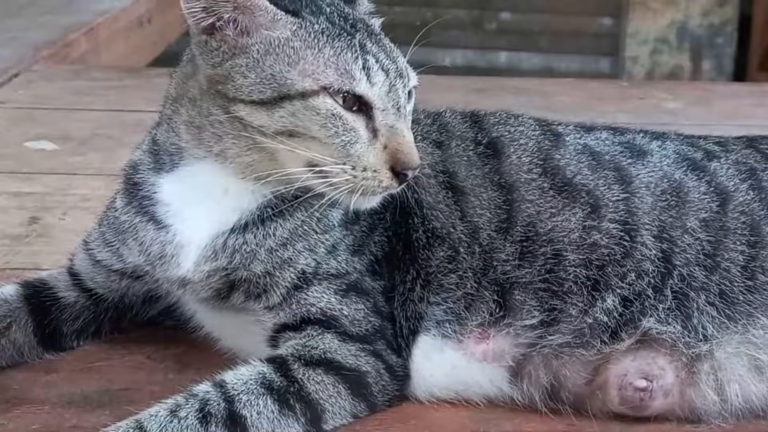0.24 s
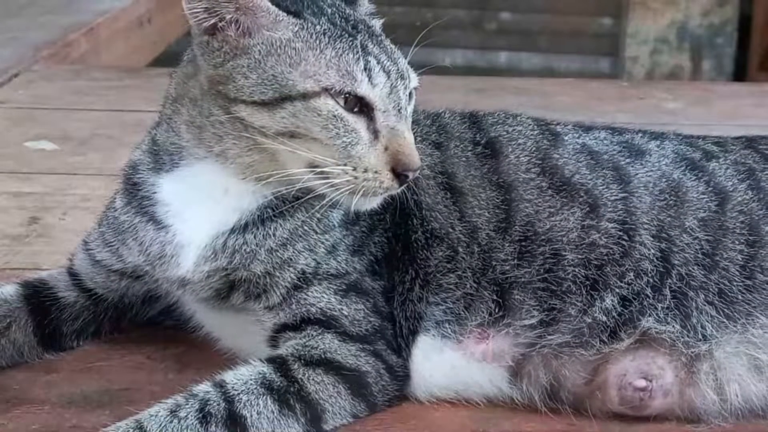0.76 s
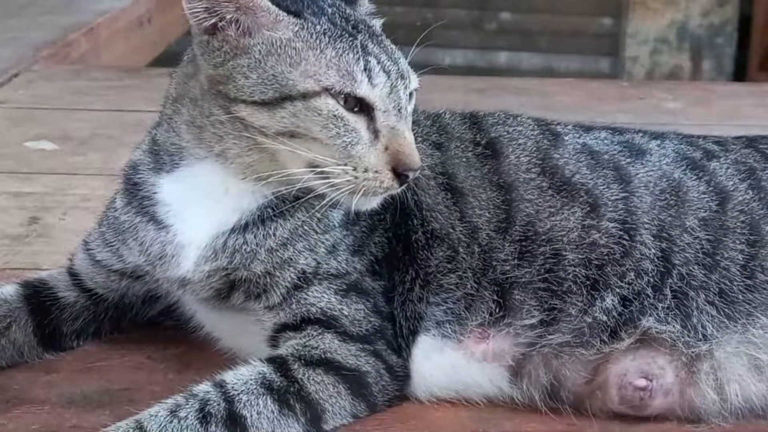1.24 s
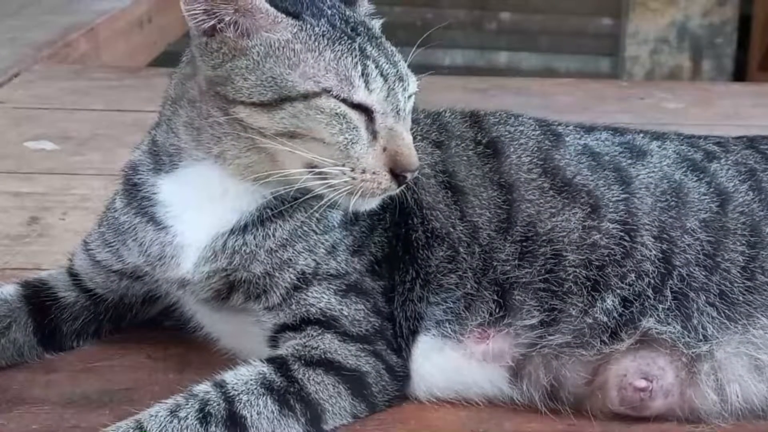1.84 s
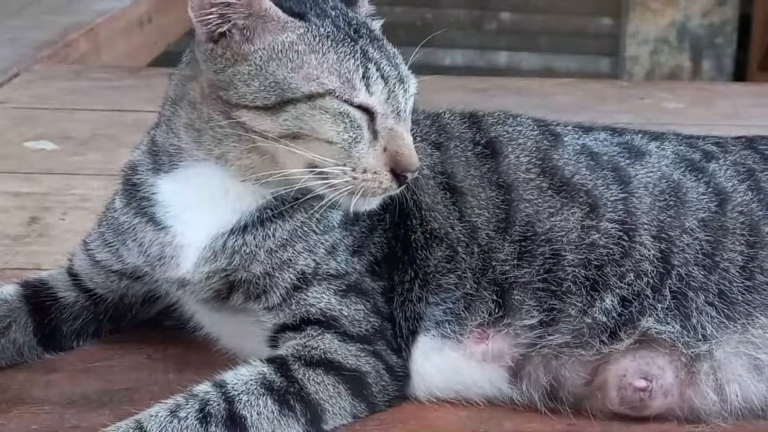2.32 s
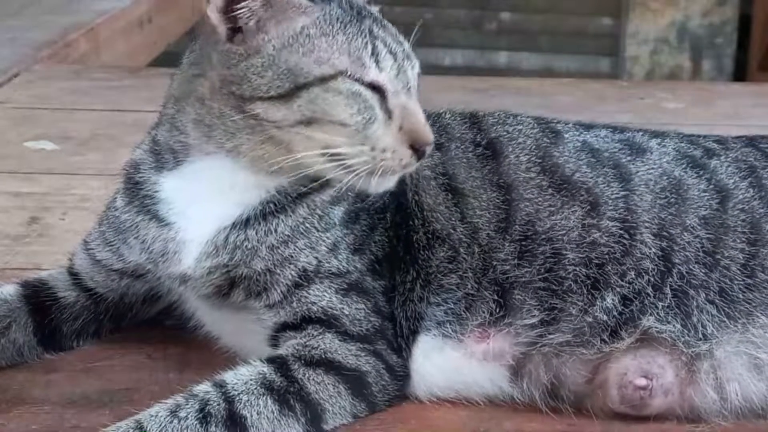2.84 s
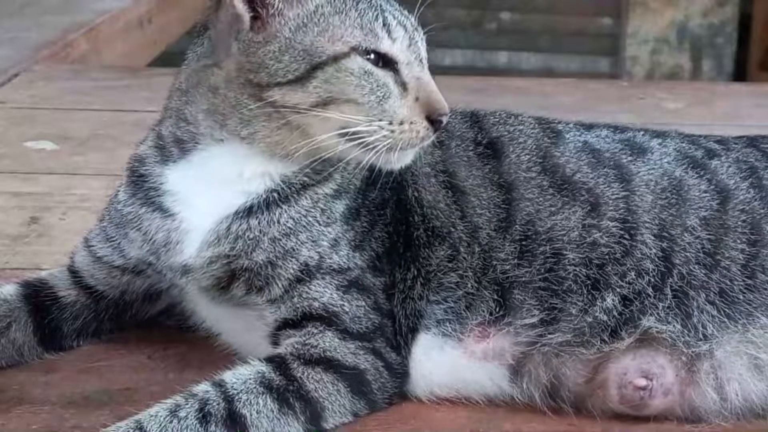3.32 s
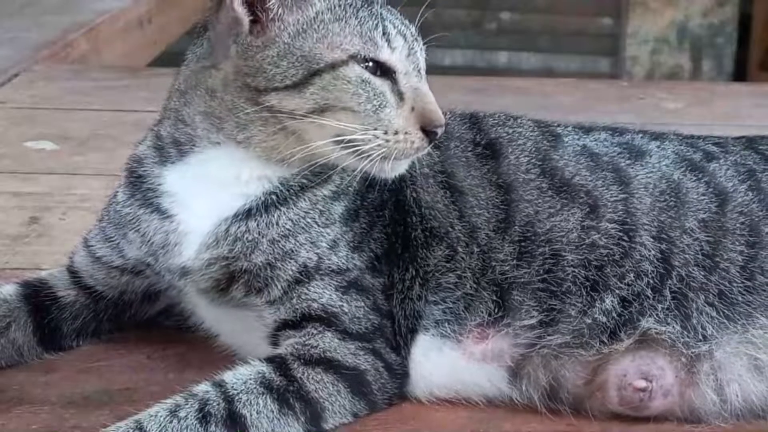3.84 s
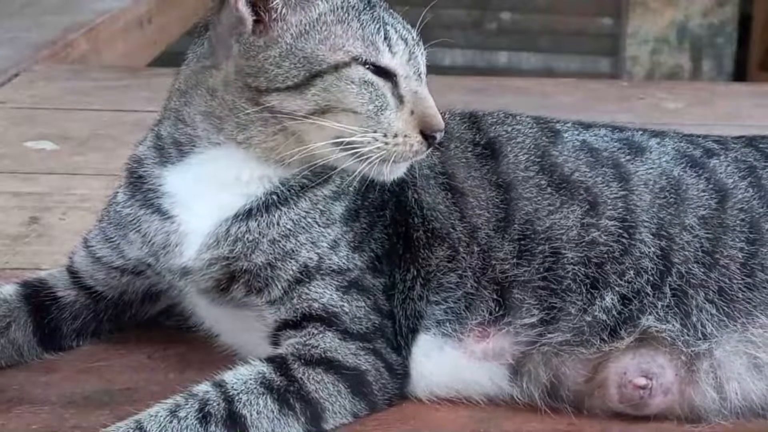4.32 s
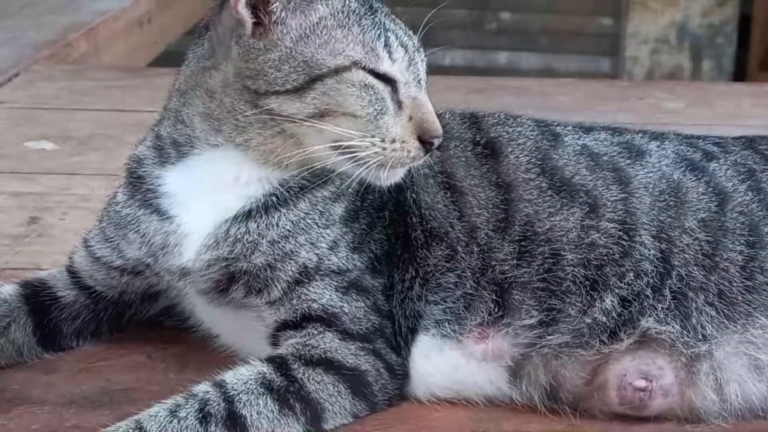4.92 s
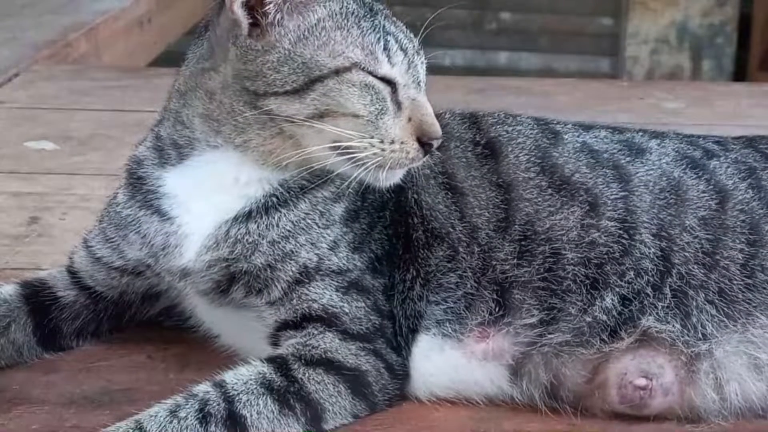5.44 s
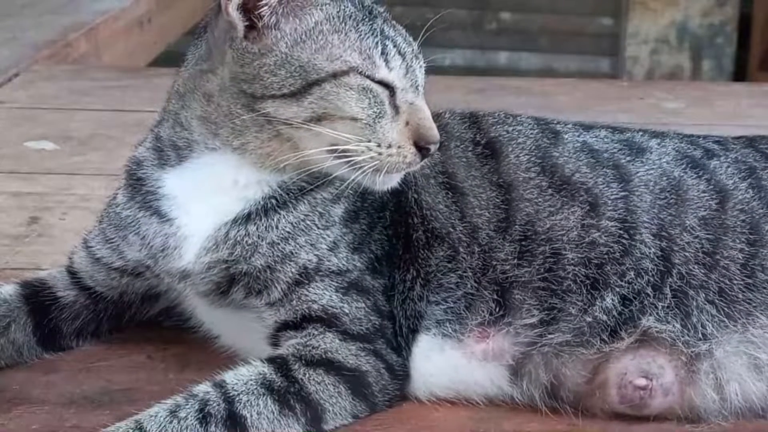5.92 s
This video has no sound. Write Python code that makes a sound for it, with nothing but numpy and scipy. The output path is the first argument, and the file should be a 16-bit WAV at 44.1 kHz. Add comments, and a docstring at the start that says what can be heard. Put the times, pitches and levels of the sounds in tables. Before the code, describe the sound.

Three loud, nasal cat yowls, the last turning hoarse, with a low traffic hum and a small motorbike puttering past between them.

```python
"""A street hums throughout; a short low rumble comes first, then a swell of hiss and a few thin, faint chirps.
A small motorbike passes to one side, its engine slowing: pulses for the exhaust, noise for the hiss.
Close by, a cat yowls three times, each yowl a stack of harmonics shaped by a mouth that opens
quickly and closes slowly, with short buzzes of overload. The pitch sags, then lifts as the yowl dies.
The last yowl breaks into a lower, hoarse note, with a soft low bump beneath it."""
import sys
import numpy as np
from scipy import signal
from scipy.fft import rfft, irfft, next_fast_len
from scipy.io import wavfile
from scipy.ndimage import uniform_filter1d, minimum_filter1d

SR = 44100
rng = np.random.default_rng(int(sys.argv[2]) if len(sys.argv) > 2 else 0)


def digitize_waveform(pressure):
    """Quantize a signal to 16-bit integers and store it at the path in sys.argv[1].

    Rows of a 2-D input are taken as channels; values are limited to [-1, 1].
    """
    field = np.atleast_2d(pressure).T
    bounded = np.clip(field, -1, 1)
    quanta = np.round(bounded * 32767).astype(np.int16)
    wavfile.write(sys.argv[1], SR, quanta)


N = 272097
TIME = np.arange(N) / SR  # s
EDGE_HZ = 15720  # nothing is heard above this

# How the cat's pitch moves, one table a yowl. Each row: time in seconds, pitch in Hz.
PITCH_CURVES = [
    [(1.275, 466), (1.31, 515), (1.35, 495.5), (1.58, 479), (1.69, 474), (1.757, 483.2), (1.825, 529.6),
     (1.9, 556), (1.98, 573)],
    [(3.65, 527.5), (3.76, 509.5), (3.885, 523.5), (3.95, 513.5), (4.055, 507.7), (4.13, 485.2),
     (4.275, 465.4), (4.36, 521.3), (4.4, 545)],
    [(5.035, 470), (5.1, 519.6), (5.2, 501.5), (5.4, 508.7), (5.455, 409.4), (5.535, 394.5), (5.605, 413.5),
     (5.665, 492.5), (5.71, 590)],
]
# The colour of the hiss of the motorbike and the street. Each row: frequency in Hz, level in dB per Hz.
HISS_COLOUR = [(150, -28.5), (350, -6.5), (520, -10.5), (700, -31), (950, -19), (2500, -20), (4350, -27.5),
               (5500, -34.5), (8300, -40), (12300, -41.5), (15500, -57.5)]


def amp(db):
    """Turns decibels into gain."""
    return 10 ** (np.asarray(db) / 20)


def evened(x):
    """Scales a sound to rms 1."""
    return x / np.sqrt(np.mean(x ** 2) + 1e-20)


def read(points, hz):
    """Reads a spectrum table at the frequencies hz, on a log-frequency axis."""
    f, value = np.transpose(points)
    return np.interp(np.log(hz + 1), np.log(f + 1), value)


def curves(rows, t):
    """Reads every column of a curve table at the times t."""
    s, *columns = np.transpose(rows)
    return [np.interp(t, s, column) for column in columns]


def add(mix, s, sound):
    """Mixes a sound in at time s."""
    part = mix[round(s * SR):][:len(sound)]
    part += sound[:len(part)]


def coloured(x, spectrum):
    """Filters a sound by a spectrum table."""
    hz = np.fft.rfftfreq(len(x), 1 / SR)
    return irfft(rfft(x) * amp(read(spectrum, hz)), len(x))


def wander(rate_hz, size):
    """Random drift of rms 1, up to about rate_hz."""
    full = next_fast_len(size)
    hz = np.fft.rfftfreq(full, 1 / SR)
    smooth = rfft(rng.standard_normal(full)) / (1 + (hz / rate_hz) ** 2)
    return evened(irfft(smooth, full)[:size])


def swell(t, middle, half_length):
    """A bell-shaped rise and fall of height 1."""
    return np.exp(-((t - middle) / half_length) ** 2)


def passing(nearest_s, pass_s):
    """Gain 1 / distance of something going by in a straight line: 1 at its closest, 3 dB down pass_s away."""
    return 1 / np.hypot(1, (TIME - nearest_s) / pass_s)


def air_noise(spectrum, patchy_db, lag_ms):
    """Stereo noise of rms 1 with drifting louder and softer patches; it reaches the left microphone later."""
    # How alike left and right are. Each row: frequency in Hz, likeness from 0 to 1.
    likeness = [(60, 0.91), (130, 0.98), (300, 0.86), (700, 0.88), (1500, 0.16), (4000, 0.34), (15000, .05)]
    hz = np.fft.rfftfreq(2048, 1 / SR)
    a, b, c, d, patches = rng.standard_normal((N // 512 + 5, len(hz), 5)).T
    patches = uniform_filter1d(patches, size=20, axis=0)
    patches = evened(uniform_filter1d(patches, size=8, axis=1))
    same = np.clip(read(likeness, hz), -1, 1)[:, None]
    right = a + 1j * b
    late = np.exp(-2j * np.pi * hz * lag_ms / 1000)[:, None]
    left = same * late * right + np.sqrt(1 - same ** 2) * (c + 1j * d)
    z = np.array([left, right]) * amp(read(spectrum, hz)[:, None] + patchy_db * patches)
    return evened(signal.istft(z, nperseg=2048, noverlap=1536)[1][:, :N])


def walls(x, early_db=7, early_s=0.05):
    """Sparse reflections from nearby walls, strongest at first, each band dying at its own speed."""
    # How long the echo lasts. Each row: frequency in Hz, time to fall by 60 dB in seconds.
    fade_times = [(500, 0.15), (950, 0.42), (1600, 0.48), (4000, 0.3), (12000, 0.028)]
    taps = np.zeros(SR)
    at = np.arange(300, SR - 20, 20)
    taps[at + rng.integers(0, 20, len(at))] = rng.choice([-1., 1.], len(at))
    hz, t, z = signal.stft(taps, SR, nperseg=256)
    fall_db = -60 * t / read(fade_times, hz)[:, None]
    tail = signal.istft(z * amp(fall_db + early_db * np.exp(-t / early_s)), SR)[1]
    return signal.fftconvolve(x, tail / np.linalg.norm(tail))[:N]


def street(hum_db=-40, hiss_db=-46, rumble_db=-36, bump_db=-41):
    """Steady distant traffic, a passing rumble with a swell of hiss, and one soft bump, all shaped noise."""
    # The colours of the hum and the rumble. Each row: frequency in Hz, level in dB per Hz.
    hum_colour = [(20, -32.5), (48, -36), (68, -7), (110, 0), (170, -3), (260, -11), (450, -14), (670, -19),
                  (1500, -23.5), (2800, -32.5), (5500, -39), (7700, -39.5), (9000, -47), (15500, -48.5)]
    rumble_colour = [(60, -34.5), (100, -3.5), (115, 3.5), (160, 2), (230, -3.5), (280, -8.5), (400, -25),
                     (700, -16.5), (1500, -51)]
    hum = amp(hum_db) * air_noise(hum_colour, patchy_db=2.0, lag_ms=0.25)
    # the rumble starts at 0.35 s, rises within 0.03 s, holds for 0.42 s, then fades by 23.5 dB a second
    age = TIME - 0.35
    level = np.clip(age / 0.03, 0, 1) * amp(rumble_db - 23.5 * np.maximum(age - 0.42, 0))
    rumble = level * air_noise(rumble_colour, patchy_db=1.2, lag_ms=0.3)
    hiss = air_noise(HISS_COLOUR, patchy_db=3.5, lag_ms=0.46)
    hiss *= amp(hiss_db) * passing(nearest_s=0.91, pass_s=0.32)
    bump = amp(bump_db) * swell(TIME, middle=5.385, half_length=0.047) * wander(45, size=N)
    return hum + rumble + hiss + bump


def chirps():
    """Thin, slightly fuzzy whistles from far off: gliding tones, unrelated at the two microphones."""
    # Each row: start in seconds, length in seconds, start pitch in Hz, end pitch in Hz,
    # width of the fuzz in Hz, level in dB.
    whistles = [(0.653, 0.39, 3600, 3760, 245, -56.5), (0.922, 0.43, 12200, 12000, 121, -65.5),
                (0.946, 0.24, 4600, 4800, 120, -59), (1.598, 0.24, 11000, 11250, 600, -59.5),
                (2.034, .08, 12700, 12700, 247, -73), (2.36, 0.085, 12600, 12600, 301, -65),
                (2.308, 0.5, 3950, 4500, 70, -61.5)]
    out = np.zeros((2, N))
    for s, length, start_hz, end_hz, width_hz, db in whistles:
        glide_hz = np.linspace(start_hz, end_hz, round(length * SR))
        phase = 2 * np.pi * np.cumsum(glide_hz) / SR
        for side in out:
            fuzz = 1 + wander(width_hz / 2, size=len(phase))
            tone = evened(fuzz * np.sin(phase + 2 * np.pi * rng.random()))
            add(side, s, amp(db) * tone * signal.windows.tukey(len(phase), 0.4))
    return out


def motorbike(engine_db=-30, echo_db=-17, hiss_db=-37.5, throb=0.092, lag_ms=0.39):
    """One exhaust pulse a firing, scattered by the walls, with hiss that throbs in step."""
    # The engine slows as it goes by. Each row: time in seconds, firings a second.
    firing_rates = [(0, 57), (1.4, 52), (2.2, 50), (3, 45.8), (3.5, 42.2), (4, 37.9), (4.5, 34.7), (5, 33),
                    (6.17, 31.5)]
    # The colour of the exhaust. Each row: frequency in Hz, level in dB.
    exhaust_colour = [(30, -48.5), (50, -22.5), (68, -3), (90, -7), (112, 0), (138, 1), (178, 2), (212, -4),
                      (275, -3), (315, -8), (375, -10.5), (550, -15.5), (800, -25)]
    # The engine briefly gets louder or softer. Each row: middle in seconds, half length in seconds, change in dB.
    throttle_spells = [(2.203, 0.11, 2), (2.857, 0.2, -1), (4.45, 0.34, 5.5)]
    rate, = curves(firing_rates, TIME)
    turns = np.cumsum(rate) / SR
    # the silencer smears each pulse over the cycle; firings vary a little in strength
    fired = sum(np.cos(2 * np.pi * k * turns + k ** 2) for k in range(1, 20))
    fired = coloured(fired * (1 + 0.16 * wander(25, size=N)), exhaust_colour)
    # the engine reaches the left side later
    ports = np.array([np.interp(TIME - lag_ms / 1000, TIME, fired), fired])
    shared_echo = walls(fired)
    side_echoes = np.array([walls(fired), walls(fired)])
    ports += amp(echo_db) * (shared_echo + 0.28 * side_echoes)
    throttle_db = sum(db * swell(TIME, s, half) for s, half, db in throttle_spells)
    engine = amp(engine_db + throttle_db) * passing(nearest_s=3.145, pass_s=0.39) * evened(ports)
    # the hiss peaks later and passes a little more slowly
    hiss = air_noise(HISS_COLOUR, patchy_db=1.5, lag_ms=lag_ms)
    hiss *= 1 + throb * np.cos(2 * np.pi * turns)
    hiss *= amp(hiss_db) * passing(nearest_s=3.62, pass_s=0.47)
    # from 4.87 s it all falls away by 9 dB within 0.2 s
    drop_db = -9 * np.clip((TIME - 4.87) / 0.2, 0, 1)
    return (engine + hiss) * amp(drop_db)


def roughness(t, dying, steady=0.005, onset=0.58, settle_s=0.026, end=0.39):
    """Roughness of the vocal folds, 0-1: until they settle, in spells of strain and as the voice dies."""
    # Each row: middle in seconds, half length in seconds, roughness from 0 to 1.
    strain_spells = [(1.478, 0.023, 0.24), (3.85, .07, 0.32), (4.143, 0.054, 0.06), (4.28, .025, .2),
                     (5.396, 0.061, 0.34), (5.692, 0.027, 0.42)]
    strain = sum(depth * swell(t, s, half) for s, half, depth in strain_spells)
    return np.clip(steady + onset * np.exp(-(t - t[0]) / settle_s) + strain + end * dying, 0, 1)


def throat(hz, mouth, middle_hz, ring_hz, bright_db, open_db=2):
    """Gain of the throat: a falling slope and moving resonances; an open mouth lets out more treble."""
    # Each row: frequency in Hz, level in dB.
    throat_slope = [(500, -13), (950, -7.5), (1500, -20.5), (2000, -16.5), (2450, -19), (3000, -28),
                    (4600, -32.5), (5300, -37), (6200, -43.5), (7500, -43.5), (8200, -49), (8650, -39),
                    (9300, -52.5), (11000, -58), (15500, -64.5)]
    # Resonances that rise as the mouth opens.
    # Each row: pitch when shut in Hz, pitch when open in Hz, width in Hz, boost in dB.
    formants = [(805, 1470, 412, 28), (5660, 7700, 253, 6.5)]
    treble = np.interp(hz, [1000, 2000], [0, 1])
    db = read(throat_slope, hz) + (bright_db + open_db * mouth) * treble
    for shut_hz, open_hz, width_hz, boost_db in formants:
        centre_hz = shut_hz + (open_hz - shut_hz) * mouth
        db = db + boost_db / (1 + ((hz - centre_hz) / width_hz) ** 2)
    # the tongue steers a twangy middle resonance and a piercing ring
    db = db + 14.5 / (1 + ((hz - middle_hz) / 230) ** 2)
    db = db + 13.5 / (1 + ((hz - ring_hz) / 196) ** 2)
    return amp(db) * (hz < EDGE_HZ)


def yowl(row, pitch, opening, shimmer=1.0, flutter=0.44, flutter_rise=0.13, skirt_db=-18, fuzz_db=-24,
         hoarse_db=-5, fundamental_db=-31):
    """A stack of harmonics shaped by mouth and throat; roughness shakes its pitch and level."""
    # Turbulence in the mouth. Each row: frequency in Hz, level in dB per Hz.
    hoarse_colour = [(600, -34.5), (950, 7.5), (2000, -8), (2800, -22.5), (4800, -12.5), (6500, -27),
                     (15000, -40.5)]
    start, length, level_db, release_s, bright_db, edge_db = row
    t = TIME[round(start * SR):round((start + length) * SR)]
    size = len(t)
    # a yowl swells, holds, then fades by 29 dB over its release
    dying = np.clip(1 - (t[-1] - t) / release_s, 0, 1)
    effort = amp(level_db - 29 * dying) * (1 - np.exp(-(t - t[0]) / 0.05))
    hz, = curves(pitch, t)
    mouth, middle_hz, ring_hz = curves(opening, t)
    rough = roughness(t, dying)
    hz = hz * (1 + 0.022 * rough * wander(130, size) + 0.0015 * wander(15, size))
    turns = np.cumsum(hz) / SR
    order = np.arange(1, 37)[:, None]
    # below 450 Hz the voice is pressed, and up to 3 dB brighter
    bright_db = bright_db + 3 * np.clip((450 - hz) / 60, 0, 1)
    # the throat shares the effort out among the harmonics
    edge = amp(edge_db * np.interp(order * hz, [4000, 7500], [0, 1]))
    gain = throat(order * hz, mouth, middle_hz, ring_hz, bright_db) * edge
    gain *= effort / np.linalg.norm(gain, axis=0)
    # the weak fundamental grows over the first quarter second and sinks at the very end
    fundamental_times = [t[0], t[0] + 0.25, t[-1] - 0.05, t[-1]]
    gain[0] = amp(fundamental_db + np.interp(t, fundamental_times, [-15, -3.5, -3.5, -10.5]))
    # the higher the harmonic, the more it flutters and frays
    slow = np.array([wander(40, size) for _ in order])
    fast = np.array([wander(220, size) for _ in order])
    unsteady = 1 + flutter * (rough + flutter_rise * order) * slow
    unsteady += amp(fuzz_db) * order * np.sqrt(rough) * fast
    harmonics = np.sin(2 * np.pi * order * turns + order ** 2)
    voice = np.sqrt(2) * (gain * unsteady * harmonics).sum(0)
    # strained folds tremble about 45 times a second
    tremble_hz = 45 * (1 + 0.27 * wander(17.5, size))
    tremble = np.sin(2 * np.pi * np.cumsum(tremble_hz) / SR)
    voice *= 1 + shimmer * rough * tremble
    # turbulence at the folds spreads a skirt of noise round each harmonic
    voice *= 1 + amp(skirt_db) * rough * wander(200, size)
    # where the voice is roughest it dissolves into hoarse noise
    breath = evened(coloured(rng.standard_normal(size), hoarse_colour))
    voice += effort * amp(hoarse_db) * rough ** 3 * breath
    return t[0], voice * np.interp(t, [t[0], t[0] + 0.013, t[-1] - 0.02, t[-1]], [0, 1, 1, 0])


def overloads(noise=1.0):
    """Short harsh buzzes of overload at set moments of the yowls: a sharp pulse and noise each cycle."""
    # Each row: start in seconds, length in seconds, level in dB.
    overload_times = [(4.253, 0.023, -36), (4.271, 0.0098, -33.5), (5.358, 0.011, -32),
                      (5.367, 0.059, -32.5), (5.457, 0.1, -35.5), (5.573, .014, -39.5)]
    # Each row: frequency in Hz, level in dB per Hz.
    overload_colour = [(1500, -23), (2900, 1.5), (4500, -2.5), (7000, -12), (10000, -17), (15000, -27)]
    hz, = curves(np.vstack(PITCH_CURVES), TIME)
    turns = np.cumsum(hz) / SR
    pulses = np.diff(np.floor(turns), prepend=0)
    # the noise is strongest at each pulse and fades over the cycle
    bursts = (0.52 + np.exp(-(turns % 1) / 0.49)) * rng.standard_normal(N)
    buzz = evened(coloured(evened(pulses) + noise * evened(bursts), overload_colour))
    gate = np.zeros(N)
    for s, length, db in overload_times:
        add(gate, s, amp(db) * signal.windows.tukey(round(length * SR), 0.7))
    return gate * buzz


def limited(x, ceiling=0.43):
    """A fast limiter: the gain dips smoothly round every peak above the ceiling."""
    allowed = np.minimum(1, ceiling / (abs(x) + 1e-9))
    return x * uniform_filter1d(minimum_filter1d(allowed, size=180), size=180)


def cat(echo_db=-14):
    """The three yowls, short buzzes of overload and their echo, straight ahead, held under a limiter."""
    # Each row: start in seconds, length in seconds, level in dB, release in seconds,
    # brightness in dB, boost of the highest harmonics in dB.
    yowl_rows = [(1.279, 0.7, -11.5, 0.21, -0.5, -5.5), (3.658, 0.77, -12, 0.14, 1.5, 1.5),
                 (5.041, .673, -13, 0.043, 2.5, 1.5)]
    # How mouth and tongue move, one table a yowl. # Each row: time in seconds, mouth opening from 0 to 1,
    # middle resonance in Hz, ring in Hz.
    mouth_moves = [
        [(1.281, 0.76, 2650, 4650), (1.32, 0.74, 2470, 4550), (1.45, 0.64, 2136, 4080), (1.6, 0.12, 2290, 3790),
         (1.75, 0.12, 2220, 3700), (1.81, 0.22, 1800, 4160), (1.98, 0, 1900, 4650)],
        [(3.655, 0.7, 2850, 5040), (3.75, 0.85, 2730, 4570), (3.88, 0.73, 2225, 4270), (4.05, .56, 2290, 4090),
         (4.16, 0.26, 2220, 3470), (4.24, 0.38, 1950, 3400), (4.29, 0.04, 2320, 4230), (4.4, .02, 1900, 4900)],
        [(5.042, 0.68, 2787, 4880), (5.11, 1, 3180, 4790), (5.22, .85, 2573, 4570), (5.3, 0.66, 2150, 4404),
         (5.39, 0.49, 2260, 3960), (5.46, 0.51, 2040, 3400), (5.58, 0.52, 1940, 3400), (5.66, 0.22, 1630, 3970),
         (5.715, 0.2, 1660, 4740)],
    ]
    voice = overloads()
    for row, pitch, opening in zip(yowl_rows, PITCH_CURVES, mouth_moves):
        add(voice, *yowl(row, pitch, opening))
    return limited(voice + amp(echo_db) * walls(voice))


def scene():
    """The street behind, the motorbike to one side, the cat in front."""
    return street() + chirps() + motorbike() + cat()


def record(dry):
    """Cuts off everything above the band edge with a steep low-pass filter."""
    low_pass = signal.firwin(1023, EDGE_HZ, window=("kaiser", 9), fs=SR)
    return signal.oaconvolve(dry, low_pass[None], "same")


dry = scene()
out = record(dry)
digitize_waveform(out)
```